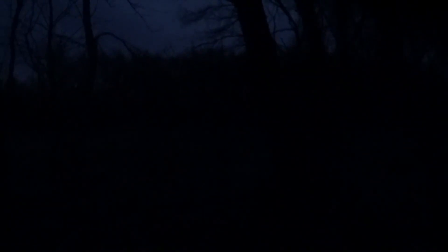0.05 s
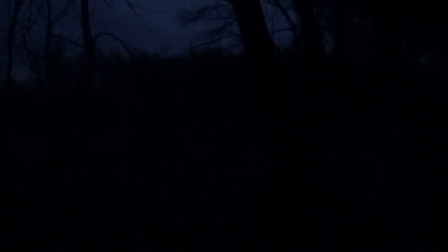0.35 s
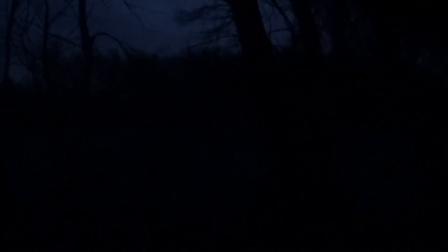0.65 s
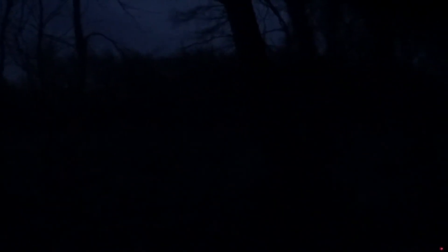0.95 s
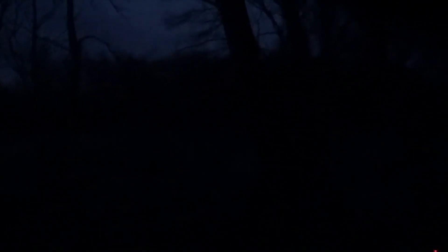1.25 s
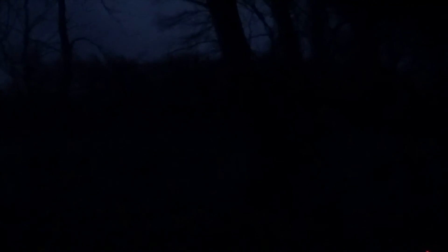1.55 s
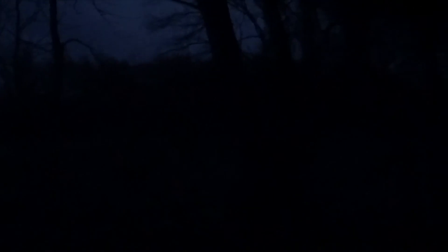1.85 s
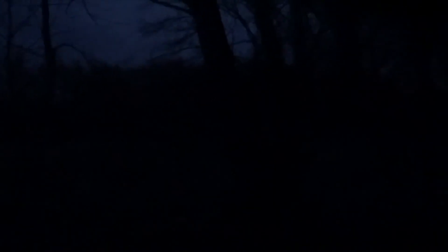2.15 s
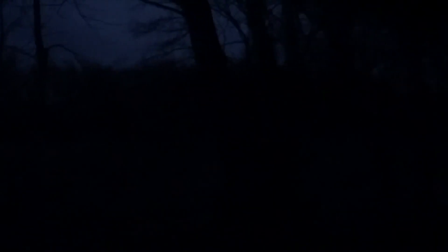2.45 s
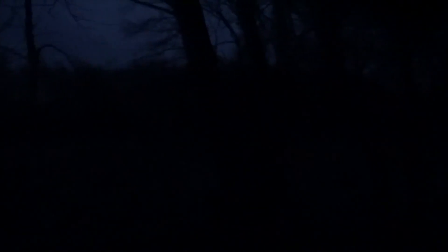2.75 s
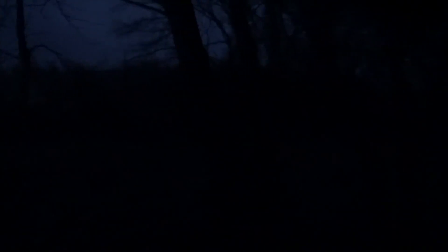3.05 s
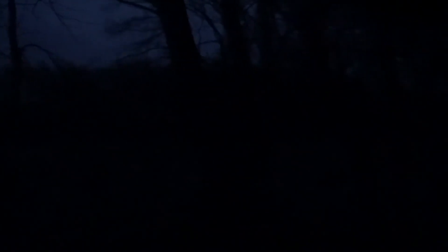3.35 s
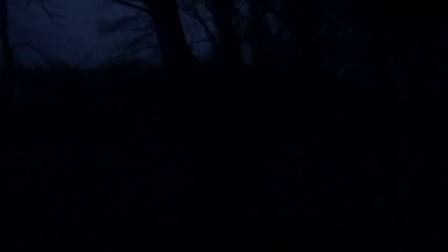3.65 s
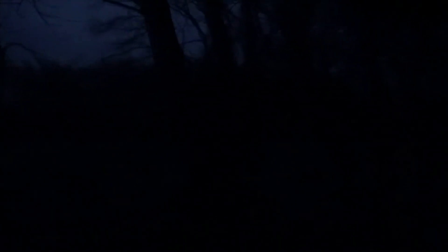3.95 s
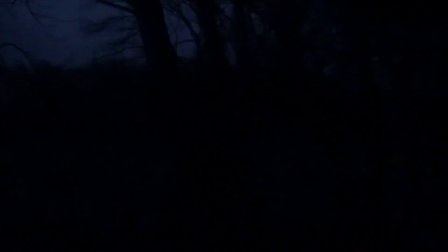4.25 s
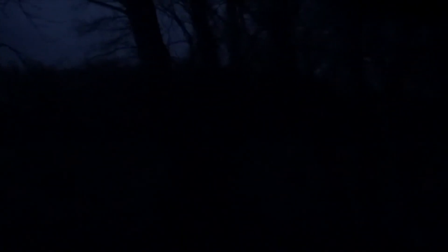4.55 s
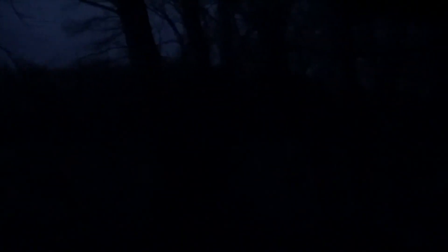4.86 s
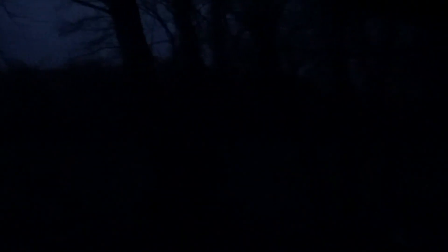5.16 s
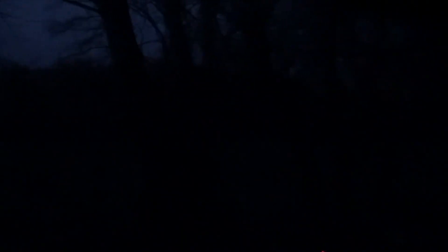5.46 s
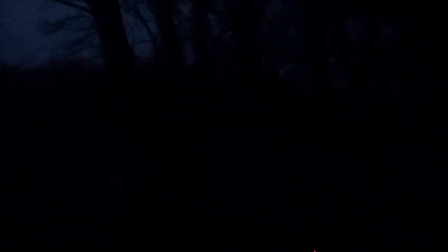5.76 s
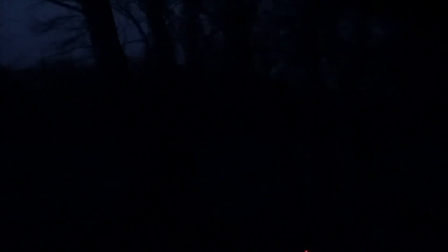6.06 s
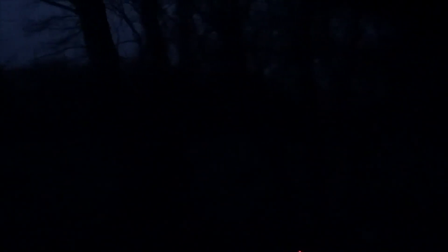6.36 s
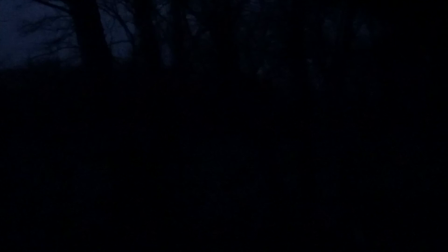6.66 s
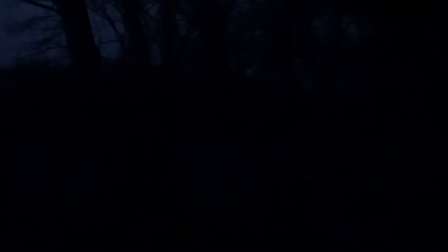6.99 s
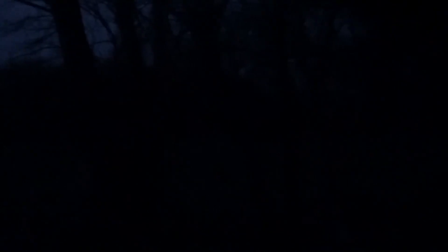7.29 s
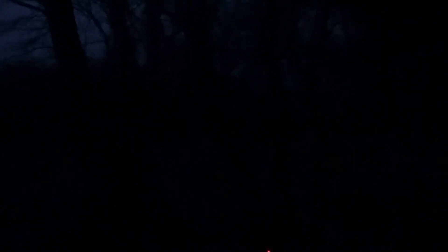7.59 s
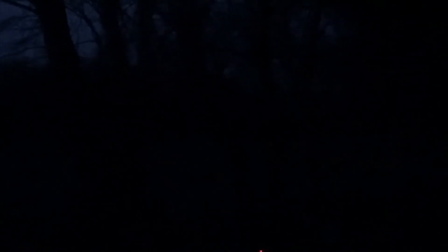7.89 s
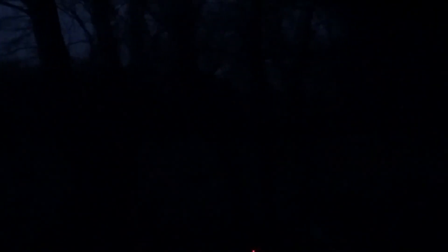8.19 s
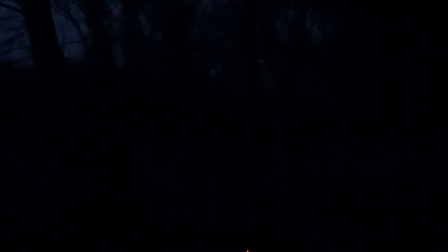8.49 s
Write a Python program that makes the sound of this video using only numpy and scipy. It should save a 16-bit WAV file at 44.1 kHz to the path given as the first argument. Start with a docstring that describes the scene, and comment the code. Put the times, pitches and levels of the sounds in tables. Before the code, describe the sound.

A flock of wild turkeys gobbles in overlapping waves deep in the woods, with hoarse squeals, whoops and hollow rattles echoing among the trees. One closer bird, slightly to the right, gobbles four times. From about halfway, a hand on the microphone adds low rumble, a cluster of thumps and sharp plastic clicks. The birds fade near the end, leaving a click, a low murmur and faint hiss.

```python
"""A far flock of wild turkeys, smeared by the trees, and hoarse squeals from a roost in the pre-dawn woods.
Toms near and farther off open with squeals and whoops and run down in a rattle of glugs. The nearest,
a little right of the microphone, gobbles four times, his syrinx buzzing through throat and beak: three
pairs of a rough bark and an arched yelp, then a cluck or two. The recorder is turned by hand, so its
case clicks, rumbles and thumps right at the microphone, over a low murmur and a faint hiss."""
import sys
import numpy as np
from scipy import signal
from scipy.fft import rfft, irfft, next_fast_len
from scipy.io import wavfile

SR = 44100
rng = np.random.default_rng(int(sys.argv[2]) if len(sys.argv) > 2 else 0)


def generate_wav(signal):
    """Clip the signal to [-1, 1] and save it as 16-bit WAV at the path in sys.argv[1]."""
    frames = np.transpose(np.atleast_2d(signal))
    scaled = np.clip(frames, -1, 1) * 32767
    pcm = np.round(scaled).astype(np.int16)
    wavfile.write(sys.argv[1], SR, pcm)


N = 376173
TIME = np.arange(N) / SR


def amp(db):
    return 10 ** (np.asarray(db) / 20)


def unit(x):
    return x / np.sqrt(np.mean(x ** 2) + 1e-18)


def colour(x, points):
    """Filter by a spectrum of (Hz, dB) points, falling steeply beyond its ends."""
    hz, db = np.transpose(points)
    size = next_fast_len(x.shape[-1])
    octave = np.log2(np.fft.rfftfreq(size, 1 / SR) + 1)
    outside = np.abs(octave - np.clip(octave, np.log2(hz[0]), np.log2(hz[-1])))
    gain = amp(np.interp(octave, np.log2(hz), db) - 480 * outside)
    return irfft(rfft(x, size) * gain, size)[..., :x.shape[-1]]


def wander(size, rate):
    """Random values, `rate` a second, joined by lines."""
    at = np.arange(size) * rate / SR
    knots = np.random.default_rng(rng.integers(2 ** 31)).standard_normal(int(at[-1]) + 2)
    return np.interp(at, np.arange(len(knots)), knots)


def swell(size, edge):
    """An envelope with rounded edges, each a share of the length."""
    u = np.linspace(0, 1, size)
    return np.sin(np.pi / 2 * np.clip(np.minimum(u, 1 - u) / edge, 0, 1)) ** 2


def add(out, s, sound):
    """Mix a sound in at s seconds."""
    i = int(np.clip(s * SR, 0, N))
    out[i:i + len(sound)] += sound[:N - i]


def pan(x, left_db):
    return x * amp(np.array([[left_db], [-left_db]]) / 2)


def phase_of(hz):
    return 2 * np.pi * np.cumsum(hz) / SR


def glug(length, start_hz, end_hz, beak_db=-21):
    """One short, nearly pure gliding note; its third partial rings in the beak near 3280 Hz."""
    size = int(length * SR)
    hz = np.linspace(start_hz, end_hz, size)
    phase = phase_of(hz * (1 + 0.067 * wander(size, 565)))
    beak = amp(beak_db) / (1 + ((3 * hz - 3280) / 220) ** 2)
    envelope = np.sin(np.pi * np.linspace(0, 1, size) ** 0.98) ** 2
    return envelope * (np.sin(phase) + amp(-32) * np.sin(2 * phase) + beak * np.sin(3 * phase))


def woods(x, t60_s, side_db, early, trunk_count=260, early_decay_s=0.025):
    """Single trunks throw separate echoes back to the microphone, which merge into a dull tail."""
    # What the trunks throw back. Each row: frequency in Hz, gain in dB.
    echo_spectrum = [(300, 11), (600, 8.5), (1100, 4.5), (1800, 3), (2400, 0.5), (3200, 0.5), (5200, 0),
                     (9000, -8)]
    size = 2 * SR
    t = np.arange(size) / SR
    trunks = np.zeros((2, size))
    distance, strength = rng.random((trunk_count, 2)).T
    trunks[0, (distance ** 2 * (size - 1)).astype(int)] = strength - 0.5
    tail = rng.standard_normal((2, size))
    decay = amp(-60 * t / t60_s) + early * np.exp(-t / early_decay_s)
    response = (0.9 * unit(trunks) + tail) * (1 - np.exp(-t / 0.0032)) * decay
    response /= np.sqrt(np.sum(response[0] ** 2))
    mid, side = signal.fftconvolve(x[None], response, axes=1)[:, :N]
    return colour(mid + amp(side_db) * np.array([side, -side]), echo_spectrum)


def chorus_envelopes(attack_s=0.11, climb_db_per_s=3.5):
    """Strength of the far flock's low and high bands: each chorus flares, climbs a little and dies away."""
    # Each row: start in seconds, seconds until the fade, relative level in dB, high band's offset in dB.
    choruses = [(-.1, 0.053, -40, -0.5), (0.19, 0.52, -42.5, -3.5), (1.705, 0.46, -37.5, -3.5),
                (2.586, 0.54, -41, -2.5), (3.767, 0.34, -44.5, -2), (4.08, 0.026, -38, 1),
                (5.17, 0.57, -36, -4), (5.93, 0.083, -44.5, 3), (6.572, 0.56, -59, -22)]
    low_power, high_power = np.zeros((2, N))
    for s, length, db, high_db in choruses:
        t = np.maximum(TIME - s, 0)
        fade_db = 17.5 * np.maximum(t - length, 0)  # outruns the climb
        strength = np.minimum(t / attack_s, 1) * amp(db + climb_db_per_s * t - fade_db)
        low_power += strength ** 2
        high_power += (amp(high_db) * strength) ** 2
    return np.sqrt(low_power), np.sqrt(high_power)


def far_flock(count=380, split_hz=1480):
    """Toms deep in the woods rattle glugs and reedy syllables over each other, arriving mostly as echo."""
    # The flock's tone at the microphone. Each row: frequency in Hz, gain in dB.
    flock_spectrum = [(400, -16), (480, 14.5), (560, 5.5), (650, -2), (760, -5.5), (980, 7), (1300, -7.5),
                      (1550, 1), (1780, -7), (2150, -16.5), (2900, -17.5), (3400, -16.5), (4000, -22.5),
                      (5000, -24.5), (6500, -52)]
    calls = np.zeros(N)
    for k, (when, long, pitch, glide, quiet, reed_pitch) in enumerate(rng.random((count, 6))):
        s = (k + when) / count * N / SR
        hz = 720 + 600 * pitch
        note = glug(0.01295 + 0.0167 * long, hz * (1 + 0.285 * glide), hz * (1.04 - 0.297 * glide))
        add(calls, s, amp(-10 * quiet) * note)
        size = int((0.0295 + 0.0431 * long) * SR)
        arch = 0.1204 * np.sin(np.linspace(0, np.pi, size))
        phase = phase_of((500 + 140 * reed_pitch) * (1 + arch + 0.0494 * wander(size, 405.7)))
        buzz = sum(np.sin(n * phase) for n in range(1, 10))
        add(calls, s + 0.02, amp(-11 - 10 * glide) * buzz * swell(size, 0.36))
    echo = woods(calls, t60_s=0.99, side_db=-3, early=3.1)
    far = colour(amp(-8) * calls + echo, flock_spectrum)
    far = np.roll(far, -SR, axis=1)  # the flock is already in full cry at the start
    low = signal.sosfiltfilt(signal.butter(4, split_hz, fs=SR, output="sos"), far)
    low_strength, high_strength = chorus_envelopes()
    chorus = amp(-4) * low_strength * unit(low) + amp(-3.5) * high_strength * unit(far - low)
    return pan(chorus, left_db=-0.5)


def air_and_ticks(murmur_db=-50.5, tick_count=36):
    """The low murmur of distant land; at the microphone, soft hiss and tiny ticks of the case."""
    # The murmur's tone. Each row: frequency in Hz, relative level in dB.
    murmur_spectrum = [(25, -25), (45, -7), (80, -3.5), (120, -4), (200, -6.5), (300, -9.5), (420, -10),
                       (750, -10.5), (1050, -18), (2000, -24.5), (3800, -26.5), (6500, -25.5),
                       (11000, -28.5)]
    # Its stereo width. Each row: frequency in Hz, side against mid in dB.
    murmur_width = [(30, -25), (120, -18), (300, -8), (700, -6.5), (2000, 4.5), (9000, -6)]
    mid, side = rng.standard_normal((2, N))
    side = colour(side, murmur_width)
    murmur = unit(colour(mid * amp(wander(N, 4.4)) + np.array([side, -side]), murmur_spectrum))
    ticks, size = np.zeros(N), SR // 200
    for when, quiet in rng.random((tick_count, 2)):
        add(ticks, when * N / SR, amp(-59 - 10 * quiet) * rng.standard_normal(size) * swell(size, 0.069))
    hiss = amp(-67 + 1.5 * wander(N, 16) + 4.5 * wander(N, 180)) * rng.standard_normal(N)
    # the case creaks most while it is being turned
    turning = np.interp(TIME, [0, 2.5, 5.5, 7, 8.5], [0.5, 1.03, 1.88, 1.33, 0.45])
    creak = colour(turning * (ticks + hiss), [(2000, 12), (3000, 13.5), (6500, 7.5), (11000, 6.7)])
    return amp(murmur_db) * murmur + creak


def squeals(jitter=0.163, flutter=0.45):
    """Toms strain a high, hoarse note that breaks up into rasp and into the octave below."""
    # Each row: start in seconds, length in seconds, first and last pitch in Hz, level in dB.
    notes = [(0.09, 0.026, 3090, 2760, -53), (0.09, 0.047, 2116, 1515, -41),
             (0.138, 0.069, 1423, 1297, -36.5), (0.239, 0.06, 1155, 1460, -39.5),
             (1.263, 0.044, 2440, 2710, -44), (1.264, 0.03, 1150, 1250, -42.5),
             (1.758, 0.065, 1382, 1604, -37), (1.829, 0.13, 1660, 1325, -39.5),
             (2.466, 0.081, 1559, 1354, -40), (3.733, 0.061, 1588, 1326, -42),
             (3.805, 0.051, 1386, 1229, -43.5), (4.176, 0.045, 1322, 1414, -37.5),
             (5.125, 0.058, 1487, 1313, -36.5), (5.306, 0.13, 1417, 1180, -35),
             (5.735, 0.051, 1338, 1253, -35.5), (6.484, 0.057, 1337, 1599, -36)]
    out = np.zeros(N)
    for s, length, start_hz, end_hz, db in notes:
        size = int(length * SR)
        phase = phase_of(np.linspace(start_hz, end_hz, size) * (1 + jitter * wander(size, 1100)))
        voice = np.sin(phase) + amp(-25) * np.sin(2 * phase) + amp(-11) * np.sin(phase / 2)
        add(out, s, amp(db) * unit(voice * (1 + flutter * wander(size, 297)) * swell(size, 0.15)))
    return out


def whoops(lowest_hz=570):
    """Clear gliding whoops stand out of gobbles near and farther off; high ones add the octave below."""
    # Each row: start in seconds, length in seconds, first and last pitch in Hz, relative level in dB.
    glides = [(0.254, 0.013, 1284, 1150, -26), (1.276, 0.04, 1067, 1200, -24),
              (1.366, 0.023, 1264, 1260, -29), (1.839, 0.042, 1192, 713, -25.5),
              (1.894, 0.033, 1855, 1260, -27), (1.923, 0.032, 1068, 580, -27.5),
              (2.386, 0.024, 595, 537, -33.5), (2.462, 0.034, 1200, 1586, -29.5),
              (2.494, 0.026, 1090, 700, -26.5), (2.6, 0.035, 1144, 1294, -32.5),
              (2.769, 0.047, 1244, 1137, -23.5), (2.915, 0.027, 1282, 1132, -26.5),
              (3.813, 0.031, 1200, 1147, -30.5), (4.133, 0.055, 1318, 1016, -23.5),
              (4.207, 0.046, 1127, 1237, -21), (4.572, 0.055, 994, 1159, -26),
              (5.129, 0.026, 820, 910, -28.5), (5.139, 0.035, 1208, 1288, -24),
              (5.19, 0.062, 1215, 1260, -23), (5.215, 0.032, 1368, 1396, -17),
              (5.237, 0.018, 1086, 940, -17.5), (5.301, 0.023, 1050, 950, -25.5),
              (5.326, 0.03, 1260, 1554, -20.5), (5.356, 0.0376, 1067, 617, -22.5),
              (5.56, 0.027, 842, 1445, -23), (5.754, 0.026, 1143, 1194, -24.5),
              (6.53, 0.05, 1292, 1163, -31), (6.561, 0.036, 748, 675, -30.5)]
    out = np.zeros(N)
    for s, length, start_hz, end_hz, db in glides:
        note = glug(length, start_hz, end_hz)
        octave_below = glug(length, start_hz / 2, end_hz / 2)
        is_high = min(start_hz, end_hz) / 2 > lowest_hz
        add(out, s, amp(db - 1) * (note + is_high * amp(-13) * octave_below))
    return out


def branches(x, decay_s=0.007, power_share=0.17):
    """Twigs round the roost scatter a call and blur its edges."""
    t = np.arange(SR // 16) / SR
    scatter = rng.standard_normal(len(t)) * np.sqrt(t) * np.exp(-t / decay_s)
    scatter *= np.sqrt(power_share / np.sum(scatter ** 2))
    return np.sqrt(1 - power_share) * x + signal.fftconvolve(x, scatter)[:N]


def rattles(glug_s=0.019, pitch_sag=0.12, rebound_s=0.015, rebound_ratio=1.08):
    """Toms near and farther off sound hollow, falling double glugs, with faint, dull yelps between them."""
    # Each row: start in seconds, pitch in Hz, level in dB, then the rebound (a higher note on the
    # glug's heels) and the ring of the beak, both in dB against the glug.
    beats = [(0.338, 998, -29.5, -0.5, -18), (0.424, 1023, -32.5, -5, -16), (.484, 1003, -30.5, -12, -14),
             (0.601, 937, -32, -7, -21), (0.652, 1037, -30.5, -3, -22), (0.684, 1027, -29.5, -7.5, -9.5),
             (.79, 984, -33, -12, -14), (.825, 950, -36, -17, -22), (.868, 933, -33, -7, -20),
             (0.955, 850, -35.5, -2, -19), (1.046, 940, -41, -9, -24), (1.15, 874, -40.5, -15, -24),
             (1.446, 928, -33, 1.5, -22), (1.61, 954, -24, -6.5, -19), (1.99, 986, -24.5, -9, -26),
             (2.067, 1040, -34, 0, -20), (2.127, 985, -23.5, -19, -14), (2.173, 983, -24.5, -13, -24),
             (2.236, 990, -33, -12, -18), (2.286, 920, -24, -11, -18), (2.35, 924, -34, -19, -22),
             (2.409, 1020, -30, -21, -24), (2.433, 907, -27, -32, -24), (2.582, 915, -30, -9, -5),
             (2.675, 853, -31, -7, -22), (2.892, 1007, -31.5, -5.5, -17), (3.112, 972, -26, -7, -7),
             (3.242, 952, -32.5, -15, -22), (3.287, 953, -31, -16, -22), (3.527, 1046, -39, -5, -24),
             (4.357, 984, -28, 1.5, -14), (4.547, 1024, -18.5, -11, -22), (4.729, 954, -26.5, -15, -13),
             (4.918, 974, -31.5, -5, -14), (5.507, 1004, -15.5, -15, -22), (5.666, 971, -20.5, -4.5, -20),
             (5.851, 1000, -23.5, -24, -15), (5.887, 820, -29.5, -22, -22), (5.935, 1040, -21, -17, -20),
             (5.972, 905, -29, -20, -22), (6.027, 1117, -27.5, -10, -25), (6.09, 990, -22, -3.5, -17),
             (6.124, 932, -26.5, -7, -22), (6.222, 1003, -30, -18, -34), (6.664, 974, -37, -4, -9),
             (6.738, 1003, -27.5, -3, -10.5), (6.916, 993, -26.5, -3.5, -13), (7.083, 983, -33, -4.5, -17),
             (7.267, 970, -41, -11, -15)]
    # Each row: start in seconds, length in seconds, top pitch in Hz, relative level and brightness in dB.
    faint_yelps = [(0.378, 0.062, 678, -47, -14), (0.493, 0.043, 618, -43, -5),
                   (0.535, 0.05, 662, -43.5, -15), (0.644, 0.042, 634, -44, -12),
                   (0.689, 0.062, 636, -43, -9), (0.858, 0.063, 633, -49, -11), (0.96, 0.045, 595, -52, -7),
                   (1.062, 0.035, 598, -47.5, -10), (2.058, 0.049, 597, -41, -17),
                   (2.132, 0.045, 745, -42, 0), (2.232, 0.047, 596, -42.5, -7),
                   (2.294, 0.071, 698, -45, -3), (2.494, 0.0584, 694, -43, -9),
                   (3.268, 0.068, 607, -43.5, -10), (5.564, 0.057, 741, -42, -6),
                   (5.674, 0.036, 587, -54, -5), (6.786, .09, 669, -46.5, -22),
                   (6.964, 0.084, 654, -47.5, -18), (7.181, 0.067, 620, -51, -13)]
    glugs, yelps = np.zeros((2, N))
    for s, hz, db, rebound_db, beak_db in beats:
        start_hz, end_hz = hz * (1 + pitch_sag / 2), hz * (1 - pitch_sag / 2)
        add(glugs, s, amp(db) * glug(glug_s, start_hz, end_hz, beak_db))
        rebound = glug(glug_s, rebound_ratio * start_hz, rebound_ratio * end_hz, beak_db)
        add(glugs, s + rebound_s, amp(db + rebound_db) * rebound)
    for s, length, hz, db, bright_db in faint_yelps:
        start_hz, end_hz = hz * (1 - 0.1045), hz * (1 - 0.034)
        yelp = syllable(length, start_hz, hz, end_hz, top_at=0.67, rough=0.3, bright_db=bright_db)
        add(yelps, s, amp(db) * yelp)
    dull_db = -11  # treble lost at 5 kHz on the way to the microphone
    path = [(450, 1.5), (1200, 2.5), (1800, -3), (3500, 0), (5000, dull_db), (8000, 2 * dull_db)]
    return glugs + colour(branches(yelps), path)


def syllable(length, start_hz, top_hz, end_hz, top_at, rough, bright_db, rasp_rate=420):
    """The syrinx buzzes in a pitch arch; it rasps when forced and brightens as the beak opens."""
    # Resonances of throat and beak. Each row: centre in Hz, width in Hz, gain in dB.
    throat = [(670, 120, -7.5), (1026, 510, 1.5), (1752, 75, 12.5), (2270, 200, 0.5), (2920, 460, -6),
              (3440, 320, -4.5), (3920, 310, -21), (4730, 800, -11.5), (5310, 160, -9), (6560, 570, -10)]
    # The tone of the rushing breath. Each row: frequency in Hz, gain in dB.
    breath_spectrum = [(600, 2.5), (1000, 0.5), (1400, -4.5), (1750, -6), (2200, -1.5), (3300, -6),
                       (4000, -6), (5100, -9), (5700, -18.5), (7500, -29)]
    size = int(length * SR)
    u = np.linspace(0, 1, size)
    closed = np.where(u < top_at, 1 - u / top_at, (u - top_at) / (1 - top_at)) ** 1.2
    pitch = top_hz + (np.where(u < top_at, start_hz, end_hz) - top_hz) * closed
    phase = phase_of(pitch * (1 + 0.083 * rough * wander(size, rasp_rate)))
    voice = np.zeros(size)
    for k in np.arange(11) + 1:
        hz = k * pitch
        power = sum(amp(2 * db) / (1 + (2 * (hz - centre) / width) ** 2) ** 1.21
                    for centre, width, db in throat)
        treble_db = (bright_db + 8) * np.clip((hz - 1900) / 700, 0, 1)
        beak_db = -16 * closed * np.clip((hz - 1800) / 2500, 0, 1)
        rolloff_db = -11 * np.clip((hz - 5150) / 300, 0, 1)  # above the last strong resonance
        # paths through the branches give each overtone its own strength and delay
        path_db = 4.5 * wander(size, 30.6) * min(k / 5, 1)
        path_phase = rng.uniform(0, 2 * np.pi)
        gain = np.sqrt(power) * amp(treble_db + beak_db + rolloff_db + path_db)
        rasp = rough * (wander(size, rasp_rate) + 1j * wander(size, rasp_rate))
        voice += gain * np.imag((1 + rasp) * np.exp(1j * (k * phase + path_phase)))
    # air rushes through once a cycle and fills the gaps between the overtones
    breath = colour(rng.standard_normal(size) * (1 + np.cos(phase)), breath_spectrum)
    breath = colour(breath, [(500, 0), (1900, 0), (2600, bright_db + 0.5), (8000, bright_db + 9.5)])
    breath = amp(-1) * rough * unit(breath) * (1 - closed / 2)
    return unit((unit(voice) + breath) * swell(size, 0.3))


def near_tom():
    """The tom closest to the microphone: pairs of a rough bark and a clear yelp, and reedy clucks."""
    # Three pairs to a gobble. Each row: start in seconds, bark level in dB, then the yelp's delay and
    # length in seconds, first, top and last pitch in Hz, place of the top 0-1, level and brightness in dB.
    pairs = [(1.271, -38, 0.045, 0.066, 558, 674, 629, 0.47, -34.5, -8.5),
             (1.447, -34, 0.047, .063, 536, 641, 538, 0.42, -36, -8.5),
             (1.611, -35.5, .041, 0.0794, 518, 638.5, 550, 0.53, -30.5, -6),
             (2.767, -38.5, 0.045, 0.059, 556, 690, 672, 0.61, -34.5, -6.5),
             (2.944, -34.5, 0.052, 0.065, 598, 651, 566, 0.51, -37, -8),
             (3.112, -34.5, 0.041, 0.072, 548, 659, 592, 0.54, -35, -4.5),
             (4.206, -36, 0.045, 0.048, 567, 701, 640, 0.75, -31, -9.5),
             (4.376, -33, 0.045, 0.065, 596, 660, 570, 0.56, -37, -7),
             (4.55, -34, .04, .072, 538, 643, 590, .72, -33.5, -1.5),
             (5.752, -35, 0.043, 0.047, 602, 702, 630, 0.64, -31, -9),
             (5.922, -29, 0.061, 0.043, 608, 652, 589, 0.4, -32, -6),
             (6.09, -32.5, 0.046, 0.077, 561, 653, 555, 0.69, -31.5, 1.5)]
    # Each row: start and length in seconds, top pitch in Hz, roughness 0-1, level and brightness in dB.
    clucks = [(1.778, 0.041, 579, 0.5, -35, -14), (1.853, 0.05, 579, 0.33, -30, -8.5),
              (3.384, 0.034, 590, 0.03, -34, -11.5), (4.814, 0.055, 592.4, 0.22, -35.5, -8),
              (6.349, 0.05, 668, 0.28, -45, -8)]
    out = np.zeros(N)
    for s, bark_db, delay, length, start_hz, top_hz, end_hz, top_at, yelp_db, bright_db in pairs:
        bark = syllable(0.036, 585, 592, 480, top_at=0.38, rough=0.45, bright_db=bright_db + 4)
        yelp = syllable(length, start_hz, top_hz, end_hz, top_at, rough=0.21, bright_db=bright_db)
        add(out, s, amp(bark_db) * bark)
        add(out, s + delay, amp(yelp_db) * yelp)
    for s, length, hz, rough, db, bright_db in clucks:
        low_hz = hz * (1 - 0.038)
        cluck = syllable(length, low_hz, hz, low_hz, top_at=0.39, rough=rough, bright_db=bright_db)
        add(out, s, amp(db) * cluck)
    return out


def case_clicks(chatter_s=0.0021, low_cut_hz=450):
    """Plastic slips by the microphone: a snap and a chatter ring the case, too small to radiate lows."""
    # Each row: start in seconds, relative level in dB, treble tilt in dB, chatter 0-1.
    slips = [(2.5815, -32, 6, 0.47), (3.475, -28, -20, 0.9), (3.838, -31, -19, 0.87),
             (3.8935, -39, 12, 0.3), (3.985, -38, 6, 0.5), (4.171, -39.5, 8, 1), (4.294, -29, 1, 0.14),
             (4.704, -36, 10, 0.3), (4.876, -46, 13, 0.7), (5.0559, -24.5, 39, 0.08), (5.2085, -38, 26, 1),
             (5.5854, -31, -11, 0.3), (5.7517, -18, -5, 0), (5.912, -19.5, 22, 0.1), (6.184, -17, 27, 0.1),
             (6.248, -39, 15, 0.2), (6.2644, -20, -15, 1), (6.625, -37, 15, 0.5), (6.74, -15.5, 4, 0.08),
             (6.89, -33, 13, 0.23), (7.1826, -32, -16, 0.62), (8.0519, -10, 0.5, 0.14)]
    # The ring of the case. Each row: frequency in Hz, seconds to fall 60 dB, relative level in dB.
    modes = [(1090, 0.018, -19), (1690, 0.0097, -9), (3320, 0.011, -10), (3970, 0.0025, 2),
             (4560, 0.0064, -3.5), (6030, 0.0029, 4.5), (6830, 0.0026, 6), (8300, 0.00079, 17),
             (9700, 0.0017, -32)]
    out, t = np.zeros(N), np.arange(SR // 30) / SR
    for s, db, treble_db, chatter in slips:
        push = chatter * rng.standard_normal(len(t)) * np.exp(-t / chatter_s) * (1 - np.exp(-t / 0.0027))
        push[0] = 1  # the snap
        ring = np.zeros(len(t))
        for hz, t60, mode_db in modes:
            tilt_db = treble_db * np.clip((hz - 4000) / 5000, -0.3, 1)
            ring += amp(mode_db + tilt_db - 60 * t / t60) * np.sin(2 * np.pi * hz * t)
        click = signal.fftconvolve(push, ring * (1 - np.exp(-t / 0.000099)))[:len(t)]
        add(out, s, amp(db + 2) * click / np.abs(click).max())
    low_cut = signal.butter(2, low_cut_hz, "high", fs=SR, output="sos")
    return pan(signal.sosfilt(low_cut, out), left_db=4)


def hand_friction():
    """Strength of the hand's friction on the case: each shift swells and fades."""
    # Each row: middle in seconds, length in seconds, relative level in dB.
    shifts = [(3.196, 0.28, -48.5), (3.525, 0.15, -60), (3.835, 0.15, -48), (4.095, 0.84, -42.5),
              (4.138, 0.095, -33), (4.513, 0.61, -29.5), (4.976, 0.53, -34.5), (5.17, 0.37, -24.5),
              (5.354, 0.3, -25.5), (5.538, 0.41, -36.5), (5.775, 0.15, -28.5), (5.948, 0.55, -37.5),
              (6.513, 0.53, -47), (7.266, 0.31, -47), (7.875, 0.11, -45), (8.096, 0.23, -44.5),
              (8.288, 0.12, -43)]
    power = np.zeros(N)
    for middle, length, db in shifts:
        add(power, middle - length / 2, (amp(db) * swell(int(length * SR), 0.39)) ** 2)
    return np.sqrt(power)


def handling(firm_db=-38):
    """The hand shifts on the case: a gentle touch only thuds, a firm one rumbles higher and rubs."""
    # The case's rumble at the microphone. Each row: frequency in Hz, relative level in dB.
    rumble_spectrum = [(13, -44), (22, -37), (52, -7), (112, 1), (175, -4.5), (230, -10), (308, -17.5),
                       (341, -21), (450, -27.5), (580, -36), (990, -120)]
    grip = hand_friction()
    mid, side = colour(rng.standard_normal((2, N)), rumble_spectrum)
    side = colour(side, [(20, -16), (60, -19), (130, -5), (260, -4), (600, 7)])
    rumble = mid + np.array([side, -side])
    thud = colour(rumble, [(20, 29), (50, 10), (100, -6.5), (300, -58), (600, -12)])
    firmness = grip / (grip + amp(firm_db))
    body = (firmness * unit(rumble) + (1 - firmness) * unit(thud)) * amp(-2 + 3 * wander(N, 35))
    rub = unit(colour(rng.standard_normal(N), [(400, -13), (2000, -26), (6500, -18), (11000, -21)]))
    return grip * (body + rub * amp(-34 + 2.2 * wander(N, 54)))


def finger_thumps(body_hz=135, length_s=0.0061):
    """A finger knocks the case: one or two heavily damped low swings."""
    # Each row: start in seconds, peak level in dB.
    knocks = [(5.083, -24), (5.153, -15.5), (5.233, -20), (5.262, -21), (5.327, -18.5), (5.355, -17),
              (5.387, -20), (5.747, -32)]
    out, t = np.zeros(N), np.arange(SR // 20) / SR
    for s, db in knocks:
        hz = body_hz * (1 + 0.095 * rng.standard_normal())
        knock = np.sin(2 * np.pi * hz * t) * t * np.exp(-2 * t / length_s)
        add(out, s, amp(db) * knock / np.abs(knock).max())
    return out


def scene():
    """Near and far birds with their echo in the woods, over the hand's noises and the air."""
    tom = branches(near_tom())
    hoarse = squeals()
    notes = rattles() + branches(whoops())
    direct = pan(tom, left_db=-3.5) + pan(notes, left_db=0) + pan(hoarse, left_db=2.5)
    scattered = amp(-10) * tom + amp(-12) * notes + amp(-8) * hoarse
    echo = woods(scattered, t60_s=2.34, side_db=-0.5, early=2.2)
    return direct + echo + far_flock() + case_clicks() + handling() + finger_thumps() + air_and_ticks()


def record(dry):
    """Sound reaches the right microphone port a moment before the left; the recorder cuts the top."""
    lag_samples, top_hz = 0.39, 11020
    left = signal.lfilter([1 - lag_samples, lag_samples], 1, dry[0])
    high_cut = signal.ellip(10, 0.2, 70, top_hz, fs=SR, output="sos")
    return signal.sosfilt(high_cut, np.array([left, dry[1]]))


dry = scene()
out = record(dry)
generate_wav(out)
```